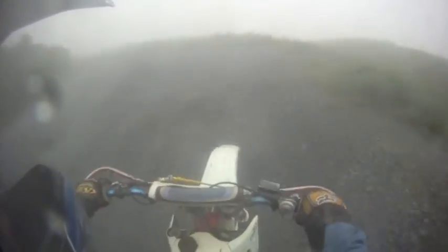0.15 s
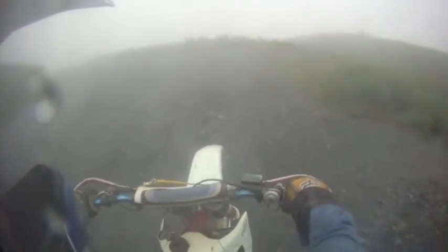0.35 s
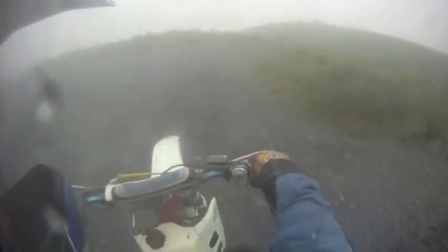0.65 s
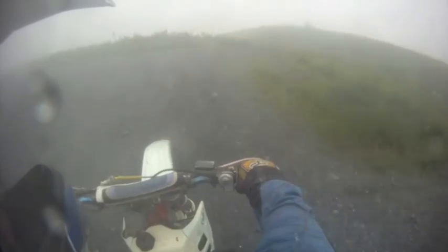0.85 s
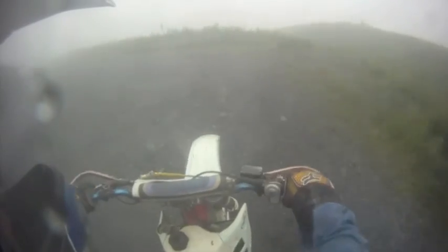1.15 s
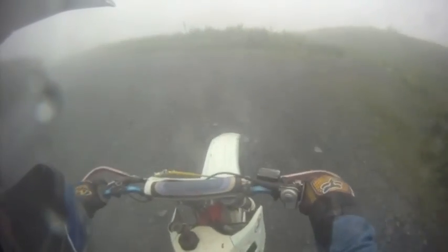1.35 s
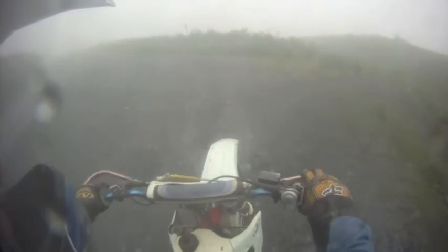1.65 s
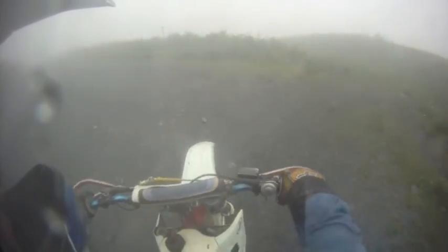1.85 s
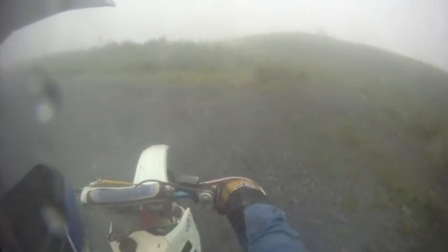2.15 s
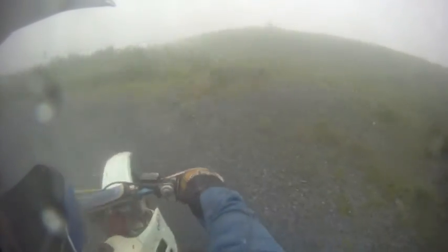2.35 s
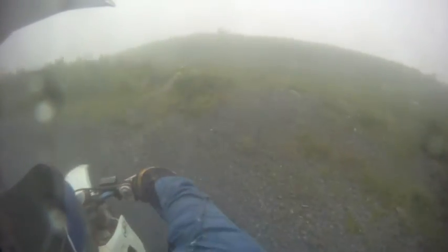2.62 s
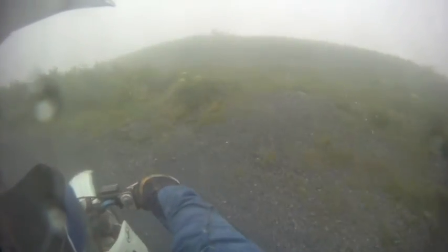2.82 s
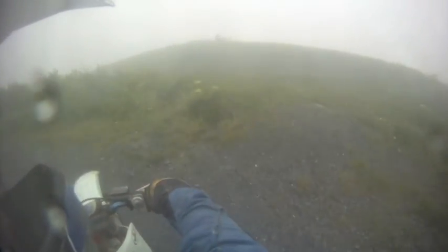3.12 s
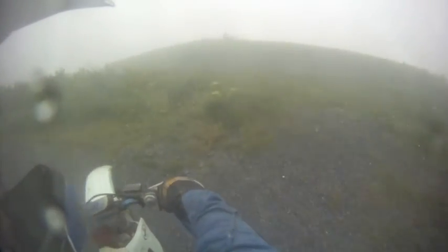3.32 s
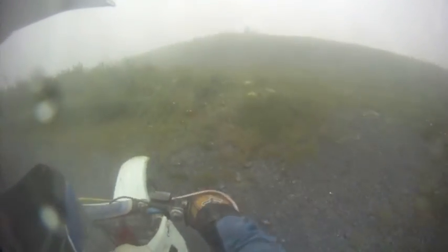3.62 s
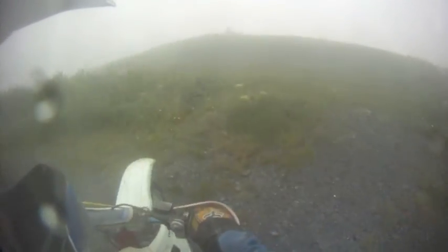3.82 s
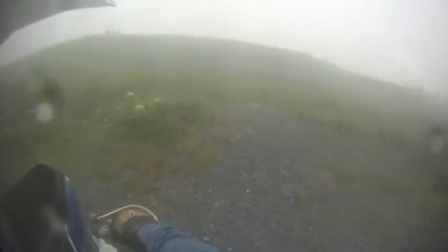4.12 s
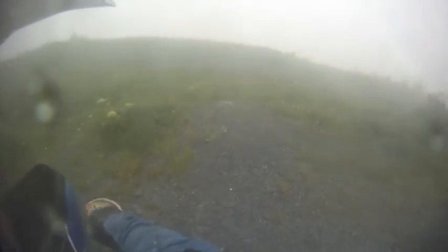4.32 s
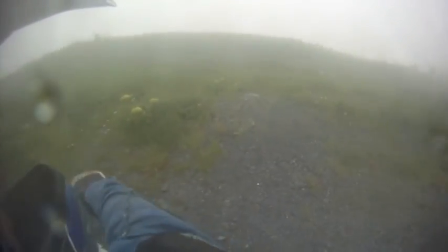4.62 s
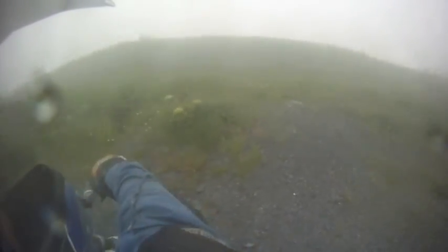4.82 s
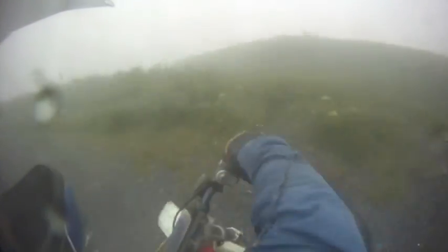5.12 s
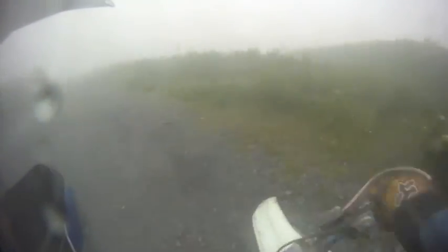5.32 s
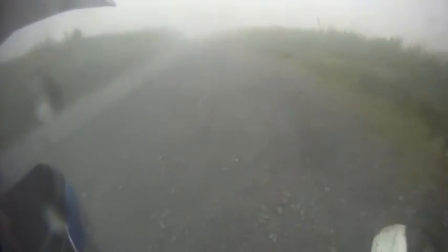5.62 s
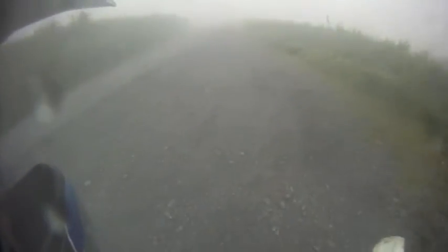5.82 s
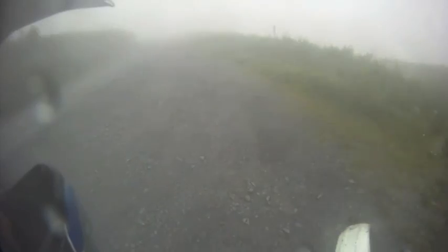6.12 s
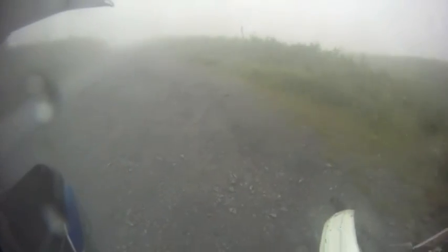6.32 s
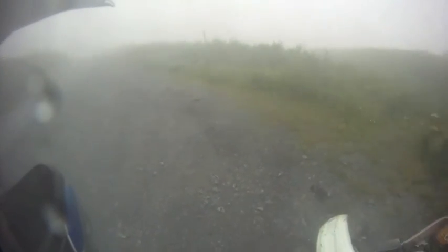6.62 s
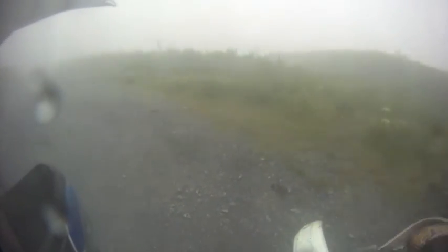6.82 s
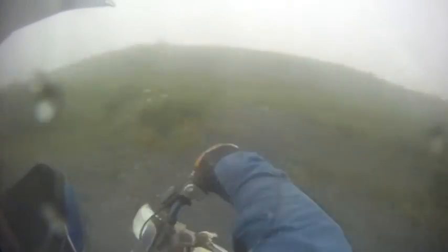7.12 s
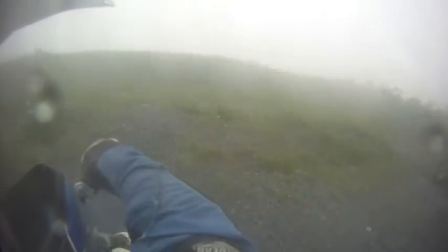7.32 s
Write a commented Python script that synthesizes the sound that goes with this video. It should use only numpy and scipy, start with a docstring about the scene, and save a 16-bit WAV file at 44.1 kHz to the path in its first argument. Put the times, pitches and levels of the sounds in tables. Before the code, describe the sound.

Heard outdoors from a helmet microphone, a dirt bike coasts with its two-stroke engine rattling, pinging irregularly and popping in the pipe. A quick rev rises and sinks back to a sputtering idle, broken by one sharp pop. Two more raspy revs follow, dying back each time. Underneath, the tyres rumble softly on loose gravel while stones and chain knock against the frame.

```python
"""A two-stroke dirt bike rolls over rough gravel, heard from the rider's helmet.
It starts out coasting down: the piston rattles the cylinder, the exhaust puffs once a turn.
From 0.8 s lone firings ping near idle and unburnt fuel pops in the pipe. Throttle blips at
2.5, 5.3 and 6.8 s spin it up, barking and rasping; it coasts down after each.
Stones and chain clatter and tyres rumble throughout."""
import sys
import numpy as np
from scipy import signal
from scipy.fft import rfft, irfft
from scipy.io import wavfile

SR = 44100
rng = np.random.default_rng(int(sys.argv[2]) if len(sys.argv) > 2 else 0)


def generate_wav(signal):
    """Clip the signal to [-1, 1] and save it as 16-bit WAV at the path in sys.argv[1]."""
    frames = np.transpose(np.atleast_2d(signal))
    scaled = np.clip(frames, -1, 1) * 32767
    pcm = np.round(scaled).astype(np.int16)
    wavfile.write(sys.argv[1], SR, pcm)


N = 328986
TIME_S = np.arange(N) / SR
FREQS_HZ = np.fft.rfftfreq(8192, 1 / SR)

# open throttle: (start [s], end [s], pull [Hz/s], first firing [dB], last firing [dB],
# chain clatter [dB], gear rasp [dB], fin buzz [dB])
BLIPS = [(-.2, -.05, 356.5, -30, -20, -37, -32, -43.5), (2.536, 2.67, 380.6, -22, -15, -43.5, -38.5, -49),
         (5.347, 5.501, 261.5, -34, -26, -40.5, -34, -42),
         (6.783, 6.94, 231.3, -36, -20, -41.5, -38.5, -44.5)]
# barely open throttle: (start [s], end [s], pull [Hz/s])
FEATHERS = [(.807, 1.492, 25.87), (1.729, 2.06, 22.56)]
# lone firings: (time [s], strength [dB])
FIRINGS = [(0.8611, -32), (0.9408, -27.5), (1.035, -30), (1.055, -31), (1.0921, -26.5), (1.2784, -27),
           (1.5715, -30), (1.9853, -31.5), (2.0152, -34), (2.225, -25.5), (2.3308, -33), (2.4174, -25),
           (2.6881, -24.5), (3.474, -22), (3.671, -29), (4.0132, -21), (4.141, -31.5), (4.2068, -28.5),
           (4.3438, -20.5), (4.4575, -27), (4.554, -31), (4.7032, -29), (4.8525, -30), (4.9589, -30),
           (5.0982, -28), (5.237, -28), (5.3506, -28.5), (5.5285, -21), (6.5684, -27.5), (6.874, -21.5)]
# unburnt fuel igniting in the pipe: (time [s], strength [dB])
POPS = [(1.2481, -13.5), (1.9458, -12), (4.1704, -8), (5.8917, -15)]
# engine level on top of the speed law: (time [s], gain [dB])
ENGINE_TRIM = [(0, -.5), (.66, 1), (.95, -1), (1.39, 3.5), (1.97, 2.5), (2.5, -4), (3.05, -2.5), (3.33, -3),
               (3.55, -3.5), (4.5, -12), (4.9, -5.5), (5.3, -9), (5.55, 4.5), (5.9, 0), (6.5, 7), (6.95, 2),
               (7.15, -3), (7.46, 0.5)]
# ring scrape against piston slap: (crank speed [Hz], ratio [dB])
RING_SCRAPE = [(40, 3), (55, -3), (68, -10), (85, -12)]
# cylinder, fins and pipe wall: (frequency [Hz], width [Hz], gain [dB])
METAL_MODES = [(910, 264, -18.5), (1170, 36, -29), (1316, 83, -3), (1374.4, 56, 4.5), (1480, 160, -1.5),
               (1687, 160, -12.5), (2203, 90, -13), (2520, 590, -28.5), (3060, 270, -39.5),
               (3763, 130, -28.5), (4137, 64, -24), (5100, 220, -35), (5860, 190, -32), (7100, 230, -38),
               (8250, 150, -31), (10120, 260, -34)]
# thin cooling fins: (frequency [Hz], width [Hz], gain [dB])
FIN_MODES = [(2090, 78, 11), (2306, 115, 12), (2488, 44, 9.5), (2770, 84, 0.5), (3070, 31, 3.5),
             (3170, 116, 2.5), (3800, 103, -6), (4113, 73, -1.5), (5210, 170, -15), (8310, 640, -15.5)]
# exhaust gas column: (frequency [Hz], width [Hz], gain [dB])
PIPE_MODES = [(153, 63, -56), (308, 29, -11.5), (401, 36, 6.5), (456.2, 44.7, 9.5), (559, 9.5, 4),
              (767, 50, -1), (910, 214, -1.5), (970, 52, 3.5)]
# air box: (frequency [Hz], width [Hz], gain [dB])
AIRBOX_MODES = [(172, 330, -13), (244, 35, 6.5), (380.8, 45, 10.5), (562, 12.5, 4.5)]
# firing against piston rattle: (frequency [Hz], gain [dB])
FIRING_COLOUR = [(300, -27), (900, 6.5), (1400, -9), (1800, 12), (2300, 8), (3100, 11), (4100, 9.5),
                 (6000, 5), (10000, 8.5), (15000, 1)]
# a pop's pressure wave in the pipe cones: (frequency [Hz], gain [dB], length [s])
POP_WAVE = [(1347, 1.5, 0.00535), (2467, -24, 0.011), (3240, -23, 0.0072), (3770, -14.5, 0.0032),
            (5280, -16.5, 0.002), (6340, -27.5, 0.0058), (9600, -37.5, 0.0041)]
# gentler wave of an ordinary turn: (frequency [Hz], gain [dB], length [s])
BARK_WAVE = [(1407, 2.5, 0.0067), (2238, -12.5, 0.0043), (4000, -19, 0.0039)]
# once-a-turn throb: (time [s], relative level [dB])
THROB_LEVEL = [(0, -59), (1.1, -52.5), (1.75, -48), (2.57, -48), (2.7, -62), (3.2, -50.5), (3.75, -50.5),
               (3.98, -62), (4.4, -55.5), (5.05, -72), (5.35, -59.5), (5.92, -65.5), (6.45, -45.5),
               (6.85, -69.5), (7.25, -68), (7.46, -52)]
# gears and chain: (frequency [Hz], width [Hz], gain [dB])
GEAR_MODES = [(392, 115, -14.5), (526, 19, -9), (842, 61, -16), (1060, 270, -14), (1271, 220, 0.5),
              (1477, 105, 1.5), (1690, 93, -3.5), (2247, 200, -11), (2600, 360, -43), (3220, 380, -24),
              (4030, 280, -22.5)]
# metallic zings atop a rev: (time [s], length [s], frequency [Hz], width [Hz], level [dB])
ZINGS = [(2.665, 0.066, 3850, 400, -44), (5.48, .11, 4100, 90, -50), (5.57, 0.17, 3110, 130, -50),
         (6.903, 0.12, 4120, 130, -53)]
# stones and chain slapping the frame: (time [s], level [dB])
SLAPS = [(.1, -54), (0.936, -49), (1.053, -53), (1.092, -52), (1.202, -49.5), (1.277, -47.5), (1.41, -54),
         (1.518, -54), (1.582, -47.5), (1.81, -58), (1.983, -54), (2.221, -48), (2.416, -54), (2.527, -52),
         (3.473, -46.5), (3.671, -52), (4.011, -46), (4.17, -54), (4.343, -59), (5.238, -46.5),
         (5.351, -47), (5.416, -43), (6.241, -55), (6.385, -51), (6.5, -55), (6.571, -45.5), (6.665, -45.5),
         (6.781, -46), (6.844, -41)]
# stone and chain ticks: (frequency [Hz], gain [dB])
GRAVEL_COLOUR = [(300, -12.5), (1500, 17.5), (3000, 3.5), (4100, 5.5), (4600, -0.5), (6500, 0.5),
                 (8400, 6.5), (9300, 2.5), (10300, 4.5), (12000, -7.5), (15000, -10)]
# throttle roars, frame and chain thuds: (time [s], length [s], centre [Hz], level [dB])
ROARS_AND_THUDS = [(1.257, 0.057, 170, -59), (1.96, 0.076, 166, -57), (2.594, 0.13, 333, -47.5),
                   (5.435, 0.21, 425, -45), (5.735, 0.062, 191.4, -54), (6.396, 0.082, 394, -49),
                   (6.502, 0.083, 426, -50), (6.585, 0.033, 408, -48.5), (6.681, 0.049, 419, -50),
                   (6.846, 0.15, 384.8, -46.5), (7.267, 0.067, 138.9, -62)]
# tyre rumble: (time [s], level [dB])
RUMBLE_LEVEL = [(0, -62.5), (1.95, -61.5), (3.55, -66), (3.9, -58.5), (5.6, -59.5), (6.3, -57), (6.5, -71),
                (7.1, -60.5), (7.3, -55.5)]
# tyre rumble: (frequency [Hz], gain [dB])
RUMBLE_COLOUR = [(20, 10), (45, 1), (90, -9), (170, 1), (260, -2), (400, -2), (560, -4), (650, -10),
                 (900, -5), (2000, -18), (8000, -40)]
# air buffets: (time [s], length [s], frequency [Hz], level [dB])
BUFFETS = [(5.703, 0.1, 29.8, -38.5), (6.522, 0.059, 36, -35.5)]
# steady hiss: (frequency [Hz], gain [dB])
HISS_COLOUR = [(20, -29), (500, -8.5), (5000, 0.5), (9000, -1), (12000, -3), (15500, -4.5)]

IDLE_HZ, COAST_S, KICK_HZ = 30.5, 0.95, 9.585  # kick of a 0 dB firing
CRUISE_HZ = 60  # reference for the speed laws
RATTLE_DB, RATTLE_DB_PER_OCTAVE = -41.5, 14.5
PIPE_DB, PIPE_DB_PER_OCTAVE, AIRBOX_DB = -52, 12, -61.5
CHUFF_DB, FIN_DB, CHAIN_DB = -7, -27.5, -20  # relative to the rattle
FIRE_LEAD_S, CHAIN_LEAD_S = 0.0092, .03  # ahead of the throttle
TOP_HZ = 15400


def undb(db):
    """Decibels to gain."""
    return 10 ** (np.asarray(db) / 20)


def unit(x):
    """Scale to rms 1."""
    return x / np.sqrt(np.mean(x ** 2))


def curve(points):
    """Straight lines through (time, value) points."""
    return np.interp(TIME_S, *np.transpose(points))


def colour(points):
    """Gain by frequency from (frequency, gain) points."""
    hz, db = np.transpose(points)
    return undb(np.interp(np.log(FREQS_HZ + 1), np.log(hz), db))


def resonances(modes):
    """Gain by frequency of steep-sided resonances."""
    return sum(undb(db) / (1 + (2 * (FREQS_HZ - hz) / width_hz) ** 2) for hz, width_hz, db in modes)


def excite(drive, ring):
    """Play a force through an impulse response."""
    return signal.oaconvolve(drive, ring)[:N]


def filtered(drive, gain):
    """Play a force through a minimum-phase response shaped by gain, peak 1."""
    cepstrum = irfft(np.log(gain))
    cepstrum[1:len(gain) - 1] *= 2
    cepstrum[len(gain):] = 0
    ring = irfft(np.exp(rfft(cepstrum)))
    return excite(drive, ring / np.abs(ring).max())


def burst(modes):
    """Pressure wave that swells and dies in milliseconds, peak 1."""
    age_s = TIME_S[:len(FREQS_HZ)]
    wave = 0
    for hz, db, length_s in modes:
        envelope = np.sin(np.pi * np.minimum(age_s / length_s, 1)) * np.exp(-age_s / length_s)
        wave += undb(db) * envelope * np.sin(2 * np.pi * hz * age_s)
    return wave / np.abs(wave).max()


def clicks(times_s, sizes):
    """Band-limited impulses at exact times."""
    out, place = np.zeros(N), np.asarray(times_s)[:, None] * SR
    taps = np.floor(place).astype(int) + np.arange(-7, 9)
    shape = np.sinc(taps - place) * np.sinc((taps - place) / 8)
    np.add.at(out, np.clip(taps, 0, N - 1), np.asarray(sizes)[:, None] * shape)
    return out


def wander(rate_hz):
    """Random values joined by straight lines."""
    return np.interp(TIME_S * rate_hz, np.arange(N), rng.standard_normal(N))


def noise(gain):
    """Coloured noise, rms 1."""
    return unit(filtered(rng.standard_normal(N), gain))


def swell(at_s, length_s, db, gain):
    """Coloured noise under a bell envelope."""
    return undb(db) * np.exp(-(2 * (TIME_S - at_s) / length_s) ** 2) * noise(gain)


def crank_speed_hz():
    """Throttle pulls, lone firings kick, drag drains the excess over idle."""
    def coast(from_s):
        return np.exp(-np.maximum(TIME_S - from_s, 0) / COAST_S)
    pulls_hz = sum(pull * COAST_S * (coast(end_s) - coast(start_s))
                   for start_s, end_s, pull, *_ in BLIPS + FEATHERS)
    kicks_hz = sum(KICK_HZ * undb(db) * (TIME_S > at_s) * coast(at_s) for at_s, db in FIRINGS)
    return IDLE_HZ + pulls_hz + kicks_hz


def strokes(turns, phase_turns, scatter_db, jitter_s):
    """One blow a turn, slightly uneven in size and time."""
    times_s = np.interp(np.arange(int(turns[-1])) + phase_turns, turns, TIME_S)
    size, slip = rng.standard_normal((600, 2))[:len(times_s)].T
    return clicks(times_s + jitter_s * slip, undb(scatter_db * size))


def load(levels_db, rise_db, release_s, lead_s=0):
    """Envelope: climbs through each blip, decays as the throttle shuts."""
    out = np.zeros(N)
    for (start_s, end_s, *_), db in zip(BLIPS, levels_db):
        top_s = end_s - lead_s
        climb = undb(np.interp(TIME_S, [start_s, top_s], [db - rise_db, db]))
        out += (TIME_S > start_s) * climb * np.exp(-np.maximum(TIME_S - top_s, 0) / release_s)
    return out


def piston_force(turns, crank_hz):
    """A slap at each end of the stroke, plus ring scrape that recedes with speed."""
    top = strokes(turns, phase_turns=.1, scatter_db=1.5, jitter_s=.00003)
    bottom = strokes(turns, phase_turns=.58, scatter_db=2, jitter_s=.00005)
    blows = unit((top + undb(-4) * bottom) / np.sqrt(crank_hz))
    scrape = unit(rng.standard_normal(N) * undb(np.cos(2 * np.pi * (turns - .3))))
    share = undb(np.interp(crank_hz, *np.transpose(RING_SCRAPE)))
    return (blows + share * scrape) / np.hypot(1, share)


def piston(turns, crank_hz, shaking, buzz_db):
    """The piston rattles the cylinder and buzzes the fins; load adds buzz."""
    force = piston_force(turns, crank_hz)
    cylinder = unit(filtered(force, resonances(METAL_MODES)))
    fins = unit(filtered(force, resonances(FIN_MODES)))
    buzz = shaking * undb(FIN_DB) + load(buzz_db, rise_db=13, release_s=.15)
    return shaking * cylinder + buzz * fins


def ping(bangs):
    """A firing cracks, rings the metal and thumps the pipe; hot gas rushes after."""
    gas = excite(np.abs(bangs), np.exp(-TIME_S[:len(FREQS_HZ)] / .007)) * rng.standard_normal(N)
    drive = bangs + undb(-32) * gas
    body = resonances(METAL_MODES) * colour(FIRING_COLOUR) + undb(-14.5) * resonances(PIPE_MODES)
    return filtered(drive, body) + undb(-25) * drive


def blips(turns):
    """Open throttle: every turn fires and barks down the pipe, louder through the blip."""
    bangs = np.zeros(N)
    for start_s, end_s, _, first_db, last_db, *_ in BLIPS:
        span_s = np.array([start_s, end_s]) - FIRE_LEAD_S
        firing_turns = np.arange(*np.interp(span_s, TIME_S, turns))
        times_s = np.interp(firing_turns, turns, TIME_S)
        bangs += clicks(times_s, undb(np.interp(times_s, span_s, [first_db, last_db])))
    return excite(bangs, burst(BARK_WAVE)) + undb(-6) * ping(bangs)


def lone_firings():
    """Stray firings ping the metal and bark down the pipe."""
    times_s, db = np.transpose(FIRINGS)
    bangs = clicks(times_s, undb(db))
    return ping(bangs) + undb(-1.5) * excite(bangs, burst(BARK_WAVE))


def pops():
    """Fuel gathered in the pipe ignites; the wave rebounds faintly."""
    times_s, db = np.transpose(POPS)
    bangs = clicks(times_s, undb(db))
    rebounds = clicks(times_s + .009, undb(db - 23))
    return excite(bangs + rebounds, burst(POP_WAVE)) + undb(-13.5) * ping(bangs)


def chuff(turns, crank_hz):
    """Fired or not, each turn sends a soft pressure wave down the pipe."""
    waves = strokes(turns, phase_turns=.1, scatter_db=2, jitter_s=.00004)
    return unit(excite(waves / np.sqrt(crank_hz), burst(BARK_WAVE[:1])))


def exhaust_and_intake(turns, crank_hz):
    """Port puffs ring the pipe, harder with speed; intake gulps drone in the air box."""
    puffs = strokes(turns, phase_turns=.1, scatter_db=.8, jitter_s=.00003)
    gulps = strokes(turns, phase_turns=.45, scatter_db=1, jitter_s=.00005)
    pipe = unit(filtered(puffs / np.sqrt(crank_hz), resonances(PIPE_MODES)))
    airbox = unit(filtered(gulps / crank_hz ** 1.16, resonances(AIRBOX_MODES)))
    pipe_db = PIPE_DB + PIPE_DB_PER_OCTAVE * np.log2(crank_hz / CRUISE_HZ)
    return undb(pipe_db) * pipe + undb(AIRBOX_DB) * airbox


def throb(turns):
    """Low tone at crank speed."""
    level_db = curve(THROB_LEVEL) - 4 + 0.59 * wander(rate_hz=7.6)
    return undb(level_db) * unit(np.sin(2 * np.pi * turns))


def drivetrain(turns, rasp_db):
    """Gears whirr; under load the teeth knock twice a turn and grind. Metal zings atop a rev."""
    rasp = load(rasp_db, rise_db=13, release_s=.06, lead_s=CHAIN_LEAD_S)
    mesh = rng.standard_normal(N) * undb(2 * np.cos(2 * np.pi * turns) + 2.6 * wander(rate_hz=33))
    drive = strokes(turns, phase_turns=.3, scatter_db=1.5, jitter_s=.00002)
    backlash = strokes(turns, phase_turns=.75, scatter_db=1.5, jitter_s=.00002)
    gears = resonances(GEAR_MODES)
    whirr = np.hypot(undb(-48), undb(-4) * rasp) * unit(filtered(mesh, gears))
    teeth = rasp * unit(filtered(drive + backlash, gears))
    zings = sum(swell(at_s, length_s, db, resonances([(hz, width_hz, 0)]))
                for at_s, length_s, hz, width_hz, db in ZINGS)
    return whirr + teeth + zings


def stones_and_chain(turns, shaking, clatter_db, ticks_per_s=4000, spread_db=3, slap_decay_s=.019):
    """Dense ticks surge each turn; shaking, slaps on the frame and load set their level."""
    ticks = (rng.random(N) < ticks_per_s / SR) * rng.choice([-1, 1], N)
    sizes = undb(spread_db * np.minimum(rng.exponential(size=N), 4))
    surge = undb(0.8 * np.cos(2 * np.pi * (turns - .15)) + 2.06 * wander(rate_hz=53))
    grains = unit(filtered(ticks * sizes * surge, colour(GRAVEL_COLOUR)))
    slaps = sum(undb(db) * (TIME_S > at_s) * np.exp(-np.abs(TIME_S - at_s) / slap_decay_s)
                for at_s, db in SLAPS)
    clatter = load(clatter_db, rise_db=12.5, release_s=.035, lead_s=CHAIN_LEAD_S)
    return (shaking * undb(CHAIN_DB) + slaps + clatter) * grains


def roars_and_thuds():
    """Short low swells: a roar under each throttle blip, and dull thuds of frame and chain."""
    return sum(swell(at_s, length_s, db, resonances([(hz, 0.95 * hz, 0)]) ** 2)
               for at_s, length_s, hz, db in ROARS_AND_THUDS)


def tyres():
    """Uneven rumble on the track."""
    return undb(curve(RUMBLE_LEVEL) + 2.2 * wander(rate_hz=11)) * noise(colour(RUMBLE_COLOUR))


def buffets():
    """Short, very low swells of air against the camera case."""
    out = np.zeros(N)
    for at_s, length_s, hz, db in BUFFETS:
        age_s = TIME_S - at_s
        out += undb(db) * np.exp(-8 * (age_s / length_s) ** 2) * np.sin(2 * np.pi * hz * age_s)
    return out


def hiss():
    """Faint and steady."""
    return undb(-65.5) * noise(colour(HISS_COLOUR))


def scene():
    """Engine, ground and air, close by in the open; mono."""
    crank_hz = crank_speed_hz()
    turns = np.cumsum(crank_hz) / SR
    *_, clatter_db, rasp_db, buzz_db = np.transpose(BLIPS)
    trim_db = curve(ENGINE_TRIM)
    shaking = undb(RATTLE_DB + RATTLE_DB_PER_OCTAVE * np.log2(crank_hz / CRUISE_HZ) + trim_db)
    engine = piston(turns, crank_hz, shaking, buzz_db)
    engine += shaking * undb(CHUFF_DB) * chuff(turns, crank_hz)
    engine += throb(turns) + drivetrain(turns, rasp_db)
    engine += undb(0.16 * trim_db) * exhaust_and_intake(turns, crank_hz)
    engine += lone_firings() + pops() + blips(turns)
    ground = tyres() + stones_and_chain(turns, shaking, clatter_db)
    return (engine + ground + hiss() + roars_and_thuds() + buffets())[None]


def record(dry):
    """The helmet camera cuts the top steeply."""
    return signal.sosfilt(signal.ellip(12, .2, 70, TOP_HZ, fs=SR, output="sos"), dry)


dry = scene()
out = record(dry)
generate_wav(out)
```